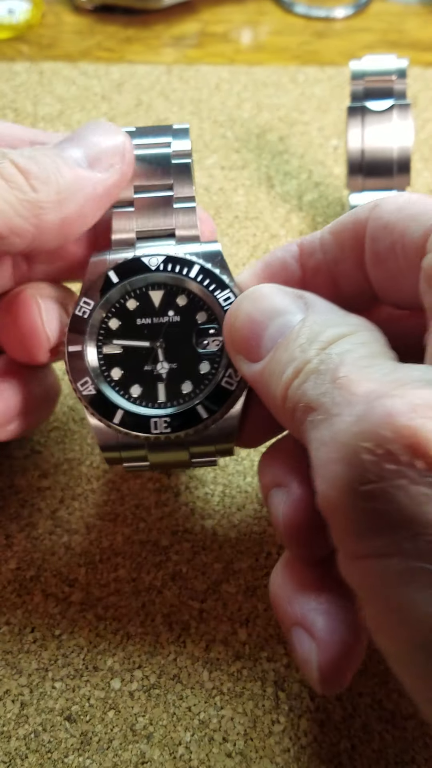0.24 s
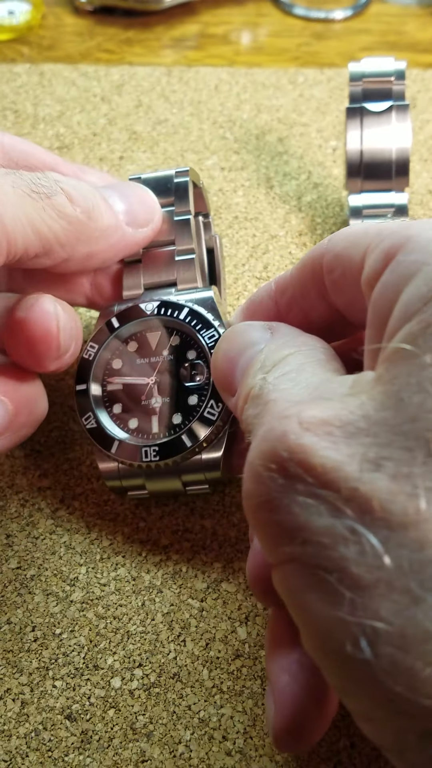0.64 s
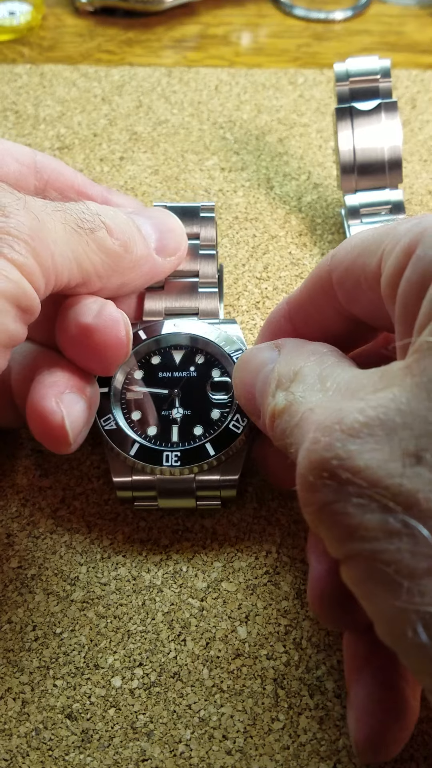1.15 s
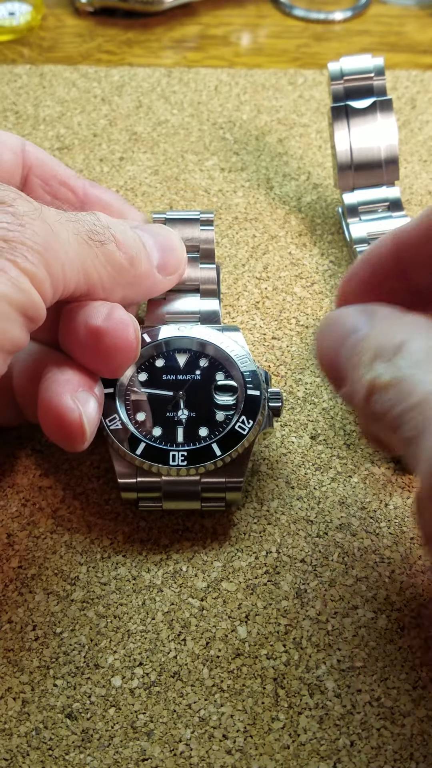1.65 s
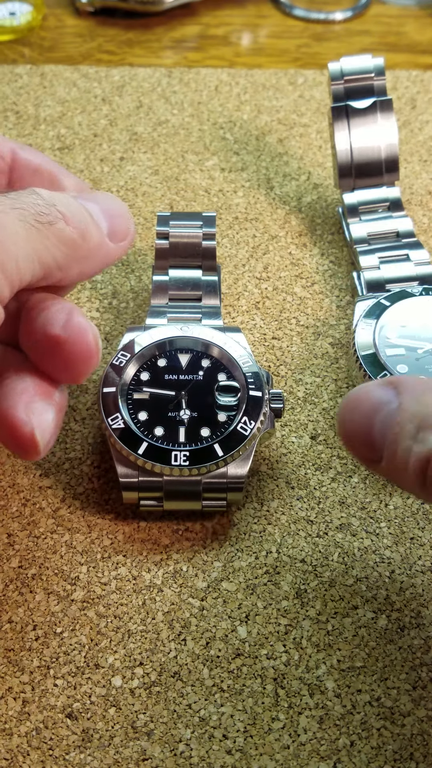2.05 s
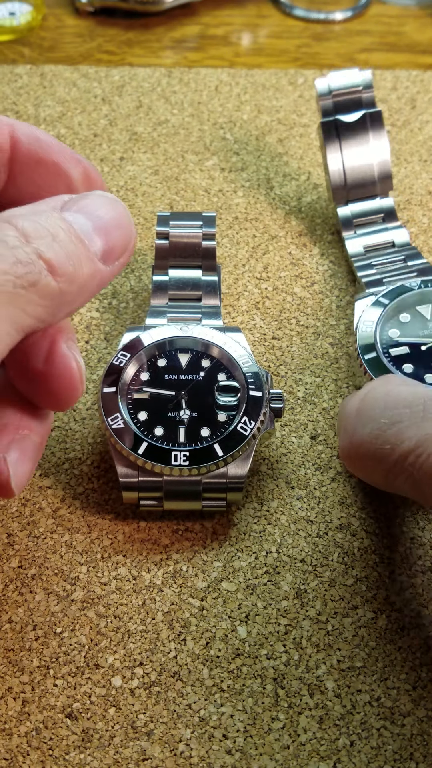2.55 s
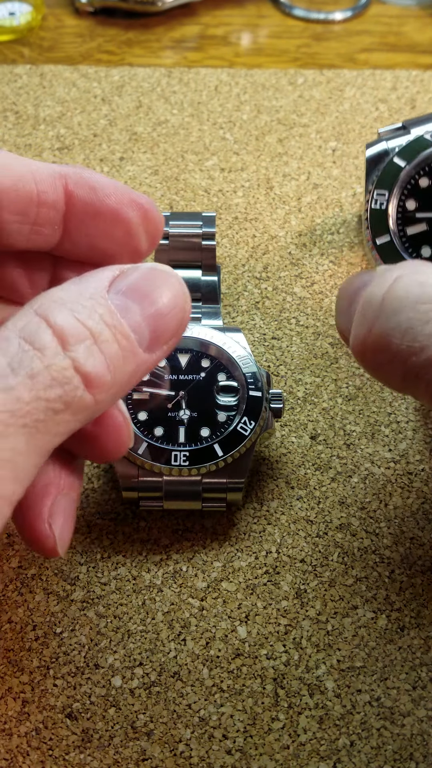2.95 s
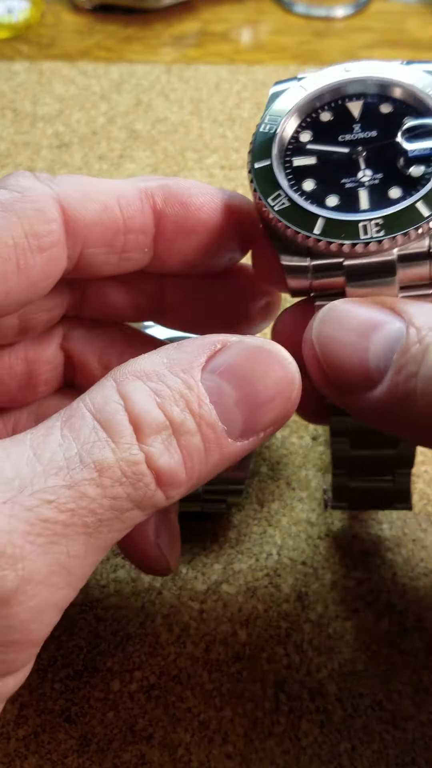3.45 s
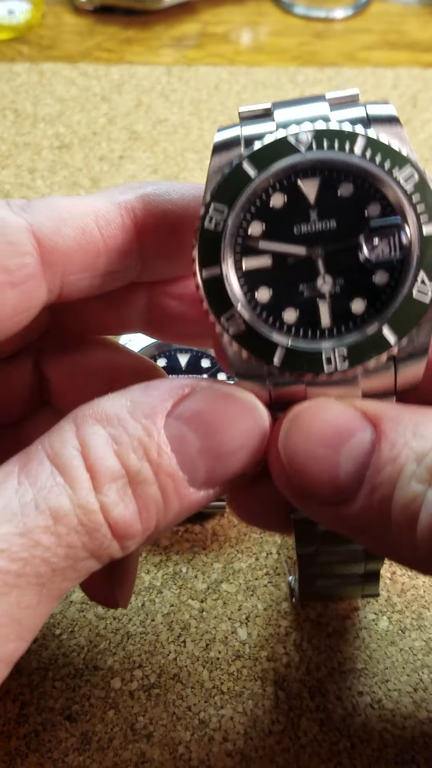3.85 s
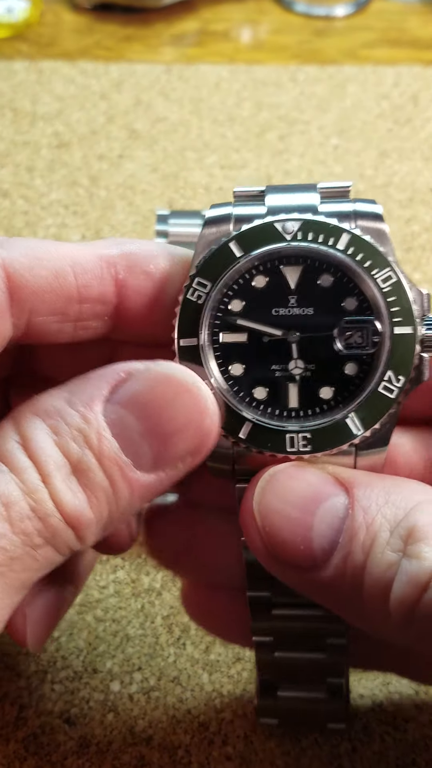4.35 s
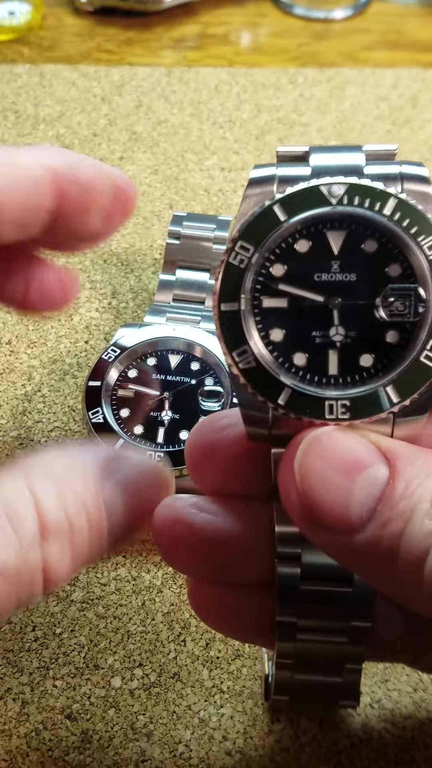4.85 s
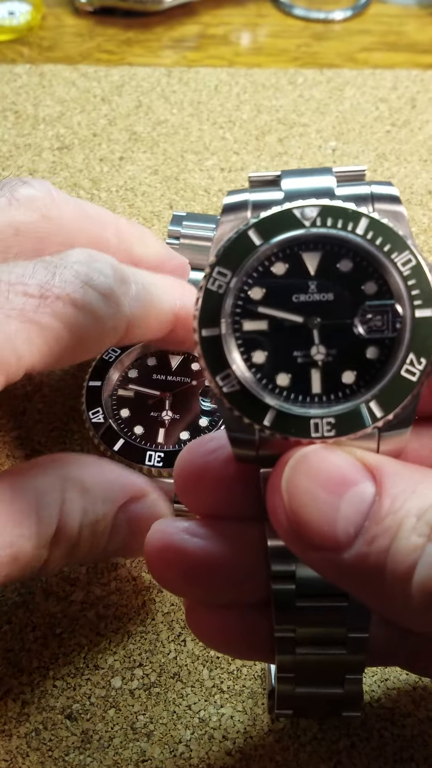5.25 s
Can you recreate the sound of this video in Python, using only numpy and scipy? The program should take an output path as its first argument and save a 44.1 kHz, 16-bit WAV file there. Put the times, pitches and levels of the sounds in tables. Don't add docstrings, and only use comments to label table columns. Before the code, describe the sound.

Close phone microphone at a wooden table: sparse, dry metal link ticks and gentle taps on cork, a small clatter before two seconds, then a strong woody thump with bright clicks. A sharp metallic snap follows, then light clinks and soft skin rustles as another bracelet is handled. Steady air noise, hiss and a faint low hum remain throughout, with little room echo.

```python
import sys
import numpy as np
from scipy import signal
from scipy.fft import rfft, irfft, next_fast_len
from scipy.io import wavfile
from scipy.ndimage import map_coordinates

SR = 44100
rng = np.random.default_rng(int(sys.argv[2]) if len(sys.argv) > 2 else 0)


def magnitude_from_level(level_db):
    exponent = np.asarray(level_db, float) / 20
    return 10 ** exponent


def digitize_waveform(pressure):
    field = np.atleast_2d(pressure).T
    bounded = np.clip(field, -1, 1)
    quanta = np.round(bounded * 32767).astype(np.int16)
    wavfile.write(sys.argv[1], SR, quanta)


N = 242991
HISS_TOP_HZ = 15880


def unit(x):
    return x / np.sqrt(np.mean(x ** 2) + 1e-20)


def along(points, hz):
    f, v = np.transpose(points)
    return np.interp(np.log(hz + 1), np.log(f + 1), v)


def curve(points):
    s, v = np.transpose(points)
    return np.interp(np.arange(N) / SR, s, v)


def wobble(rate):
    knots = rng.standard_normal(int(N * rate / SR) + 4)
    return map_coordinates(knots, [np.arange(N) * rate / SR])


def filtered(x, response):
    m = next_fast_len(x.shape[-1] + 2048)
    shaped = rfft(x, m) * response(np.fft.rfftfreq(m, 1 / SR))
    return irfft(shaped, m)[..., :x.shape[-1]]


def resonance(centre_hz, width_hz):
    return lambda f: 1j * f * width_hz / (centre_hz ** 2 - f * f + 1j * f * width_hz)


def rush(gain, alike):
    turn = lambda hz: np.arccos(np.clip(along(alike, hz), -1, 1)) / 2
    noise = rng.standard_normal((2, N))
    mid, side = filtered(noise, lambda hz: gain(hz) * [np.cos(turn(hz)), np.sin(turn(hz))])
    return unit(np.array([mid + side, mid - side]))


def add(track, s, sound, pan_db):
    start = round(s * SR)
    track[:, start:][:, :sound.shape[1]] += sound * magnitude_from_level([[pan_db / 2], [-pan_db / 2]])


def burst(t60, colour, rise, alike):
    t = np.arange(SR // 20) / SR
    sizes_db = 3.5 * np.repeat(rng.standard_normal(len(t) // 21), 21)
    lumps = magnitude_from_level(sizes_db * (t > .001)) * (1 + 1.3 * magnitude_from_level(-60 * t / 0.0053))
    envelope = lumps * magnitude_from_level(-60 * t / t60) * np.minimum(t / rise, 1)
    a, b = filtered(rng.standard_normal((2, len(t))) * envelope, colour)
    turn = np.arccos(np.clip(alike, -1, 1)) / 2
    x = np.cos(turn) * a + np.sin(turn) * b * [[1], [-1]]
    return x * np.sqrt(t60 * SR / 40 / np.sum(x ** 2, 1, keepdims=True))


# pitch in Hz, width in Hz, level in dB.
LINK_MODES = [(4600, 56, -26), (6500, 57, 0), (8000, 250, -10.5), (9400, 1200, -21), (10900, 490, -19)]
# start in seconds, peak in dB, link pitch in Hz, sparkle in dB.
LOWERING = [(.0618, -61.5, 7360, -9), (.203, -57, 6600, -3), (.2171, -52, 5570, -4),
            (.2231, -40, 9000, 2.5), (.2764, -68, 3890, -7), (.3067, -62, 3670, -16),
            (.4294, -62.5, 5730, -15), (.4919, -45, 6200, -41), (.6636, -69, 4130, -9),
            (.7082, -48, 11000, -1), (1.2885, -53.5, 6800, -20), (1.2977, -50, 7200, -23),
            (2.1594, -64, 6690, -11)]
LANDING = [(1.7479, -34.5, 6540, -1), (1.7545, -54, 8000, 4), (1.7705, -52, 5200, -8),
           (1.776, -55, 5600, -8), (1.7818, -54, 6800, -17), (1.7868, -56, 6900, -15),
           (1.7628, -40.5, 11500, -4), (1.7652, -41, 5100, -3), (1.7657, -42, 6850, -3),
           (2.6528, -41, 4730, 7), (2.653, -37, 6840, 11), (2.6594, -55, 4840, 15), (2.677, -50, 12500, 3),
           (2.6808, -41.5, 6500, 3), (2.6964, -40, 11200, -6), (2.7099, -41.5, 10850, -8),
           (2.7101, -49.5, 6460, -10), (2.6535, -36, 12500, -8)]
LIFTING = [(2.536, -65, 8950, 0), (2.5711, -45, 10200, -1), (2.6204, -61, 4510, 2),
           (2.8534, -60, 4300, -12), (2.8638, -56, 6240, -14), (2.9088, -62, 4310, -7),
           (2.9223, -59.5, 4450, 10), (3.0132, -58, 10900, 17), (3.0178, -63, 6000, 14),
           (3.0375, -56, 4140, 15), (3.047, -54, 6500, 3), (3.051, -47, 12400, -3), (3.0655, -58, 8500, 13),
           (3.0685, -60, 6000, 13), (3.0738, -41, 5600, 1), (3.0745, -43, 7600, 13), (3.0815, -47, 7500, 6),
           (3.0865, -58, 7900, 8), (3.0915, -57, 7650, 6)]
CARRYING = [(3.1605, -54, 4150, 2), (3.2871, -52, 5750, 0), (3.3595, -37, 8900, -3),
            (3.3602, -49, 6200, -5), (3.3792, -55, 9000, 3), (3.4225, -56, 5600, 6), (3.392, -50, 11200, 3),
            (3.4119, -45, 5600, 11), (3.4122, -46, 8900, 8), (3.489, -57, 8000, -19),
            (3.5907, -66, 6350, -8), (3.6168, -52, 6370, -4), (3.6436, -58, 5960, 4)]
SETTLING = [(3.9853, -57, 4050, -10), (4.0112, -49, 5300, -16), (4.015, -42.5, 7650, -8),
            (4.0227, -52, 10300, -15), (4.0652, -43, 8200, -6), (4.1096, -43, 3850, -10),
            (4.1102, -50, 7800, -4), (4.1478, -46.5, 4300, 3), (4.148, -42, 8200, 6),
            (4.1571, -38, 9400, -14), (4.165, -51, 6170, -3), (4.248, -51.5, 8700, -21),
            (4.3524, -59, 6670, 1), (4.377, -57, 6500, -20), (4.5955, -55, 3900, -18)]
NUDGING = [(4.6805, -49.5, 8800, -14), (4.702, -42, 9800, -17), (4.7025, -48, 4930, -5),
           (4.6808, -52, 4700, -10), (4.722, -50, 9700, -5), (4.7218, -49, 4600, -10),
           (4.7407, -38, 10500, -11), (4.7408, -45, 5200, 8), (4.748, -54, 9500, 2),
           (5.1347, -51.5, 10300, -23), (5.3136, -52, 7050, -2), (5.3472, -60, 5900, -17),
           (5.398, -54, 4550, -22), (5.406, -60, 10500, -10), (5.4356, -46, 10300, -10),
           (5.4354, -45.5, 5450, -21), (5.4375, -53, 8500, -2), (5.459, -41.5, 10400, -21),
           (5.4598, -42, 5400, -8), (5.4872, -44.5, 4600, -26), (5.488, -50, 8450, -9)]
# contacts, time to die by 60 dB in seconds,
# left over right in dB, wide crack in dB, lower sparkle in dB.
GESTURES = [
    (LOWERING, 0.0091, 2.7, -28, -2),
    (LANDING, 0.019, 6, -10, -5),
    (LIFTING, 0.01, 4.4, -18, -24),
    (CARRYING, 0.0072, 1.2, -18, -14),
    (SETTLING, 0.013, 1.5, -7, -10),
    (NUDGING, 0.011, -3.5, -16, -15),
]


def links():
    track = np.zeros((2, N + SR))
    rise_s = .00015
    for contacts, t60, pan_db, crack_db, shimmer_db in GESTURES:
        crack = lambda f: magnitude_from_level(crack_db) * resonance(6500, 14000)(f) ** 2

        def sparkle(f):
            high = magnitude_from_level(-6) * resonance(15300, 2600)(f) ** 2
            edge = resonance(14900, 500)(f) - magnitude_from_level(2) * resonance(15680, 450)(f)
            return high + edge + magnitude_from_level(shimmer_db) * resonance(12800, 2000)(f) ** 2

        for s, db, hz, sparkle_db in contacts:
            away = abs(np.log2(np.transpose(LINK_MODES)[0] / hz))
            shares = magnitude_from_level(rng.normal(0, 3, len(LINK_MODES)) - 6 * away)

            def body(f):
                ring = resonance(hz, .1 * hz)(f) + magnitude_from_level(-15) * resonance(hz, 1.1 * hz)(f) ** 2
                for k, (share, (mode_hz, width_hz, level)) in enumerate(zip(shares, LINK_MODES)):
                    ring = ring + (-1) ** k * share * magnitude_from_level(level) * resonance(mode_hz, width_hz)(f)
                return ring + crack(f)

            tick = burst(t60, body, rise_s, alike=-0.036)
            tick = tick + magnitude_from_level(sparkle_db) * burst(t60, sparkle, rise_s, alike=-0.031)
            add(track, s + 0.0011, magnitude_from_level(db + 1.5) * tick, pan_db)
    return track[:, :N]


# start in seconds, peak in dB, left over right in dB, right port's delay in seconds.
SNAP = (3.0748, -20, 3, .00014)
# pitch in Hz, width in Hz, level in dB.
CLASP = [(1080, 120, -10), (2750, 350, -15), (5400, 300, -17), (6300, 500, -18), (7650, 600, -8),
         (10000, 900, -17), (12300, 1200, -15), (13500, 300, -16), (14900, 450, 0), (15650, 300, 0),
         (16300, 800, -5)]


def clasp():
    track = np.zeros((2, N + SR))
    s, db, pan_db, later_s = SNAP
    delay_s = np.array([[0], [later_s]])

    def ring(f):
        modes = sum((-1) ** k * magnitude_from_level(level) * resonance(hz, width_hz)(f)
                    for k, (hz, width_hz, level) in enumerate(CLASP))
        return modes * np.exp(-2j * np.pi * f * delay_s)

    snap = filtered(np.eye(1, SR // 20), ring)
    add(track, s, magnitude_from_level(db) * snap / abs(snap).max(), pan_db)
    return track[:, :N]


# start in seconds, peak in dB, pitch in Hz, left over right in dB.
TAPS = [(0.137, -56.5, 826, -1), (.203, -56, 1050, -1), (1.287, -51.5, 770, 3), (1.288, -55.5, 2030, -6),
        (1.359, -57, 764, -8), (1.748, -52, 900, -1), (1.763, -45, 1520, -3), (2.653, -28.5, 950, 4),
        (2.657, -38, 850, 2), (2.661, -37.5, 700, 2), (2.674, -45, 1070, 5), (2.699, -44, 580, 4),
        (2.68, -44, 1160, -7), (2.697, -48.5, 1090, 0), (2.908, -58, 2000, -4), (2.925, -58, 1090, 10),
        (3.051, -52, 762, 0), (3.073, -41, 1050, 0), (3.16, -59, 837, 0), (3.359, -56, 2320, -4),
        (3.411, -51, 780, -4), (4.013, -54, 1500, 2), (4.11, -53, 1800, 2), (4.157, -51.5, 1610, 0),
        (4.377, -57, 754, 8), (4.68, -58, 2000, -3), (4.74, -56, 2100, -4), (4.147, -56, 2800, 2),
        (4.022, -57, 1500, 0), (5.459, -55, 1100, -3), (4.702, -57, 1800, -.5), (4.722, -57.5, 1630, 1),
        (5.134, -56.5, 2000, 5), (5.436, -52.5, 1010, 0), (5.485, -53, 1470, 0)]


def cases():
    track, blow = np.zeros((2, N + SR)), np.eye(1, SR // 20)
    for s, db, hz, pan_db in TAPS:
        hard_db = max(db + 36.5, 0)
        t60 = 0.031 * np.exp(-0.088 * hard_db)
        body = lambda f: resonance(hz, .25 * hz)(f) + magnitude_from_level(-22) * resonance(1600, 2000)(f) ** 2
        clatter = burst(t60, body, 0.0014, alike=0.23)
        add(track, s + 0.00108, magnitude_from_level(db - 0.48 * hard_db) * clatter, pan_db)
        if hard_db > 0:
            upper = lambda f: resonance(2650, 700)(f) + resonance(4850, 500)(f)
            knock = filtered(blow, lambda f: resonance(hz, .9 * hz)(f) ** 2 + magnitude_from_level(-15) * upper(f))
            add(track, s + .0006, -magnitude_from_level(db + 2.5) * knock / abs(knock).max(), pan_db)
    return track[:, :N]


# start in seconds, peak in dB, boost of the upper modes in dB.
THUDS = [(0.424, -44, 2), (0.601, -61, 15), (1.283, -48, -1), (1.557, -46.5, -2), (1.747, -37, -1),
         (1.763, -39, 2), (2.186, -52, 0), (2.653, -18, 5.5), (2.6606, -28.5, 6), (2.67, -26, 7),
         (2.697, -24, 0.5), (2.853, -41, -9), (2.918, -43, 3.5), (3.048, -36.5, -2), (3.072, -34.5, -9.5),
         (3.146, -44.5, 4.5), (3.3, -41, -1), (3.343, -40.5, 3), (3.411, -46, 13.5), (4.01, -37, -15),
         (4.096, -39, -4.5), (4.547, -51.5, 8.5), (4.831, -54, -6)]
# pitch in Hz, level in dB, time to die by 60 dB in seconds,
# left over right in dB.
BOARD = [(74.3, -30, 0.59, 7), (143, 2.5, 0.19, 1.5), (235, -15.5, 0.54, -4), (258.5, -0.5, 0.13, 0.5),
         (299, -5.5, 0.12, -5), (343, -16, 0.082, 3), (389, -26, 0.17, 3), (450, -16, 0.07, 10),
         (567, -14, 0.071, 7), (824, -43, 0.12, 19), (1090, -29, 0.12, 4), (690, -20, 0.04, 4)]


def table():
    track, t = np.zeros((2, N + SR)), np.arange(SR // 2) / SR
    side = np.array([[.5], [-.5]])
    port_t = t + side * 0.000091
    for s, db, upper_db in THUDS:
        ring = 0
        for hz, level, t60, pan_db in BOARD:
            mode_db = level + upper_db * (hz > 200) + side * pan_db - 60 * t / t60
            ring = ring + magnitude_from_level(mode_db) * np.sin(2 * np.pi * hz * port_t)
        soft_start = 1 - np.exp(-t / 0.0012)
        add(track, s, -magnitude_from_level(db - 10) * ring * soft_start, -.5)
    return track[:, :N]


# middle in seconds, half length in seconds, level in dB,
# smoothness in dB (below 0 is cork, above is steel).
STROKES = [(.14, 0.057, -84.5, -10.5), (.267, 0.077, -76, 3), (2.435, 0.049, -71.5, 3.5),
           (2.574, 0.12, -80, 3.5), (2.798, 0.14, -71, -3), (2.982, 0.12, -76.5, -8.5),
           (3.078, 0.067, -78, -13.5), (3.333, 0.084, -76.5, -3), (3.64, 0.11, -78, 1), (4, 0.11, -75, 1),
           (4.143, 0.084, -75, 0), (4.368, 0.073, -77, 3), (4.502, 0.046, -75, 4), (4.595, 0.082, -78.5, 2),
           (4.8, 0.07, -75, 6.5), (5.193, 0.077, -81, 8.5), (5.358, 0.07, -75.5, 0), (5.45, 0.067, -73, -1)]
# frequency in Hz, level in dB.
SCUFF = [(250, -20), (500, 6.5), (1000, -0.5), (2000, -10), (4000, -20)]
RUSTLE = [(500, -40), (1200, 4), (3000, 3), (7000, -18), (10000, -16), (16000, -22)]
SWISH = [(5000, -2), (10000, -5.5), (12000, -1.5), (15500, 3)]


def fingers():
    t, out = np.arange(N) / SR, 0
    # colour, likeness of the sides, level in dB, share of the smoothness
    for colour, alike, over_db, lean in [(SCUFF, .5, 0, -1), (RUSTLE, -.1, -2, 0), (SWISH, -.1, 0, 1)]:
        swell = 0
        for s, half, db, smooth_db in STROKES:
            bump = np.clip(1 - ((t - s) / half) ** 2, 0, 1)
            swell = swell + magnitude_from_level(db + over_db + lean * smooth_db) * bump
        out = out + swell * rush(lambda f: magnitude_from_level(along(colour, f)) * (f < HISS_TOP_HZ), [(1000, alike)])
    return magnitude_from_level(2.5 * wobble(90)) * out


# frequency in Hz, time to die by 60 dB in seconds.
WALLS = [(300, 0.13), (2000, 0.22), (8000, 0.11), (16000, 0.087)]


def walls(x):
    hz, t, z = signal.stft(rng.standard_normal((2, SR // 3)), SR, nperseg=256)
    fading = z * magnitude_from_level(-60 * t / along(WALLS, hz)[:, None])
    tail = signal.istft(fading, SR, nperseg=256)[1]
    tail = tail / np.linalg.norm(tail[0])
    late = np.pad(x, ((0, 0), (180, 0)))
    answer = signal.fftconvolve(late, tail, axes=1)[:, :N]
    return filtered(answer, lambda f: f < HISS_TOP_HZ)


# time in seconds, pressure in dB.
PRESSURE = [(0.0, -67), (0.57, -61), (0.98, -63.5), (1.56, -68), (1.78, -63), (2.24, -64.5), (2.64, -59),
            (2.81, -52.5), (2.89, -53.5), (3.11, -59.5), (3.83, -61), (4.17, -59.5), (4.57, -59.5),
            (5.12, -62), (5.51, -57.5)]
# time in seconds, level in dB.
SWAY = [(0, -78), (3.2, -76), (3.4, -64), (3.55, -80), (4.3, -78), (4.8, -65), (5.51, -62)]
# time in seconds, level in dB.
DRONE = [(0, -76), (3.95, -68), (4.15, -59), (4.95, -58.5), (5.5, -71)]
# pitch in Hz, level in dB.
MAINS = [(120, -74), (213, -72.5)]


def hum():
    pressure_db = curve(PRESSURE)
    mean_db = pressure_db.mean()
    swing_db = pressure_db - mean_db
    mode = lambda hz, width_hz: rush(lambda f: abs(resonance(hz, width_hz)(f)) ** 2, [(100, 0.98)])
    rumble = magnitude_from_level(-8 + 1.04 * swing_db) * mode(65, 45)
    low = magnitude_from_level(-4 + 1.3 * swing_db + 2.35 * wobble(13)) * mode(138.5, 50)
    high = magnitude_from_level(-8.5 + 1.1 * swing_db + 2.8 * wobble(11)) * mode(250.7, 55.4)
    sway = magnitude_from_level(curve(SWAY)) * mode(70, 50)
    drone_hz = 237 + 0.71 * wobble(5.4)
    drone = magnitude_from_level(curve(DRONE) + 0.55 * wobble(9)) * np.sin(2 * np.pi * np.cumsum(drone_hz) / SR)
    appliances = sum(magnitude_from_level(db) * mode(hz, 3.2) for hz, db in MAINS)
    return magnitude_from_level(mean_db) * (rumble + low + high) + sway + drone + appliances


# frequency in Hz, level in dB per Hz.
ROOM_TONE = [(18, -44), (30, -3), (65, -0.5), (96, -12), (134, -4), (163, -3), (185, -10), (205, -9.5),
             (337, -7.5), (383, -16), (539, -19), (900, -21.5), (1170, -56), (1980, -120)]
HISS = [(530, -30), (900, -1), (1050, -1), (1580, -3.5), (1990, -4.5), (3420, -9.5), (9260, -20),
        (12100, -13), (15200, -9), (15900, -10.5)]
# frequency in Hz, likeness from -1 to 1.
ALIKE = [(60, 0.68), (150, 0.89), (380, 0.54), (950, -0.024), (2380, -0.0037), (5980, -0.22),
         (15000, 0.053)]
# frequency in Hz, left over right in dB.
LEAN = [(60, 2), (240, -4), (950, -1), (3770, -1), (15000, 1)]


def room_tone():
    air = magnitude_from_level(-62.5) * rush(lambda f: magnitude_from_level(along(ROOM_TONE, f)) * (f < 900), ALIKE)
    hiss_colour = lambda f: magnitude_from_level(along(HISS, f)) * (f >= 900) * (f < HISS_TOP_HZ)
    hiss = magnitude_from_level(-71.5) * rush(hiss_colour, ALIKE)
    return filtered(air + hiss, lambda f: magnitude_from_level(along(LEAN, f) * [[.5], [-.5]]))


def scene():
    steel = links() + cases() + clasp()
    return steel + magnitude_from_level(-12) * walls(steel) + table() + hum() + fingers() + room_tone()


def roll_off(x):
    return signal.sosfilt(signal.butter(12, 17150, fs=SR, output="sos"), x)


def record(dry):
    bass_cut = lambda f: (1j * f / (40 + 1j * f)) ** 3
    top_db = [(15800, 1), (16600, -3), (16900, -25), (17050, -40)]
    top = lambda f: magnitude_from_level(along(top_db, f)) * (f < 17050)
    mix = filtered(dry, lambda f: bass_cut(f) * top(f)) - .0005
    return roll_off(mix)


dry = scene()
out = record(dry)
digitize_waveform(out)
```